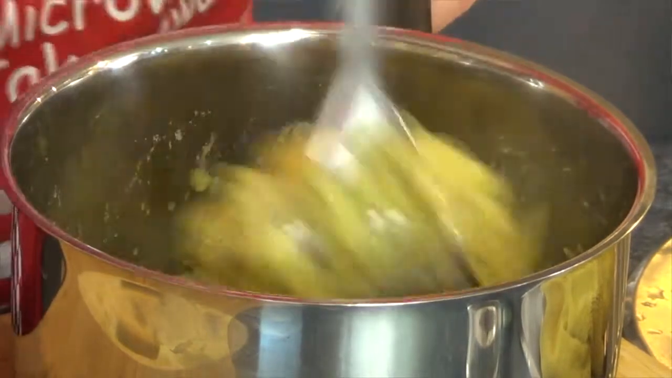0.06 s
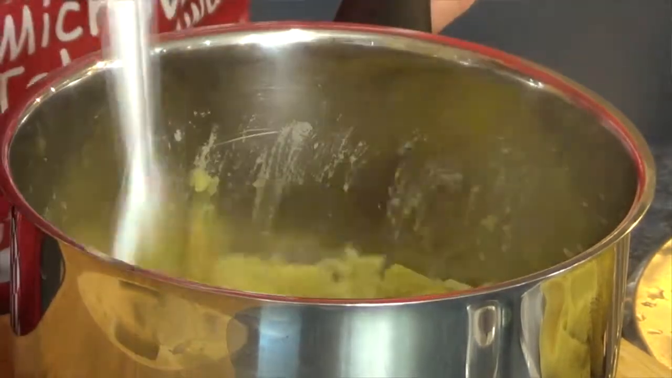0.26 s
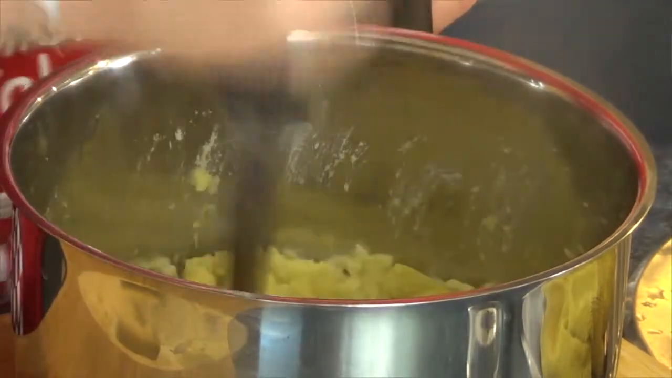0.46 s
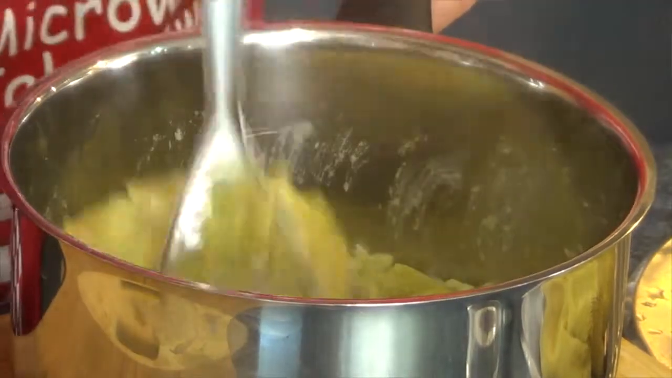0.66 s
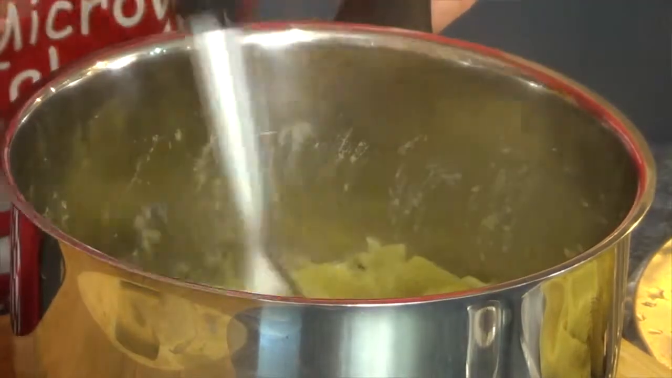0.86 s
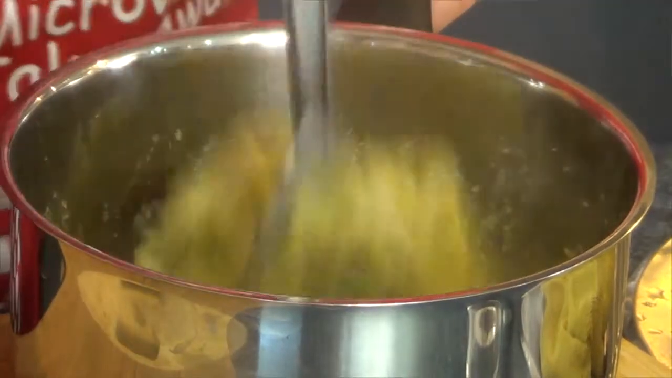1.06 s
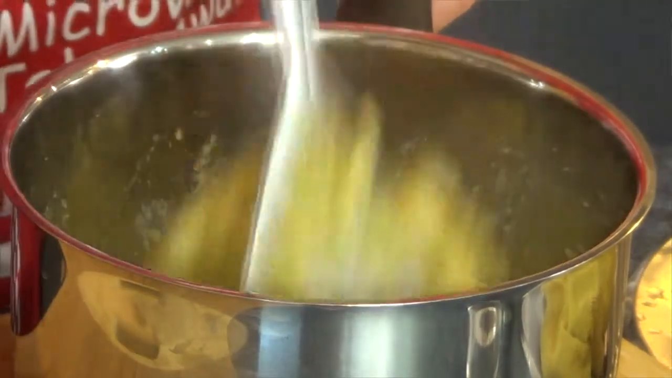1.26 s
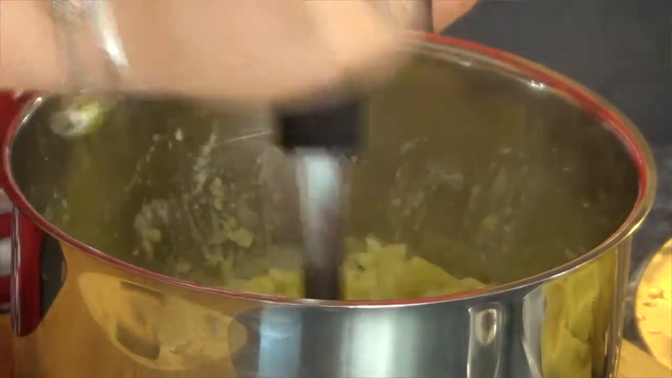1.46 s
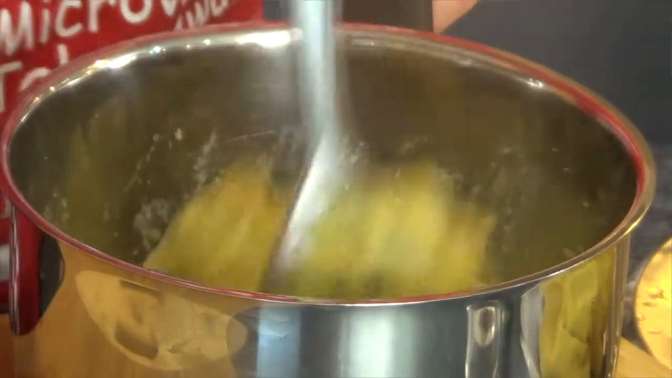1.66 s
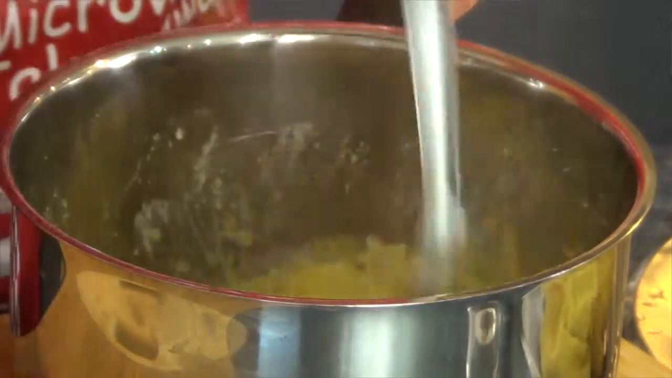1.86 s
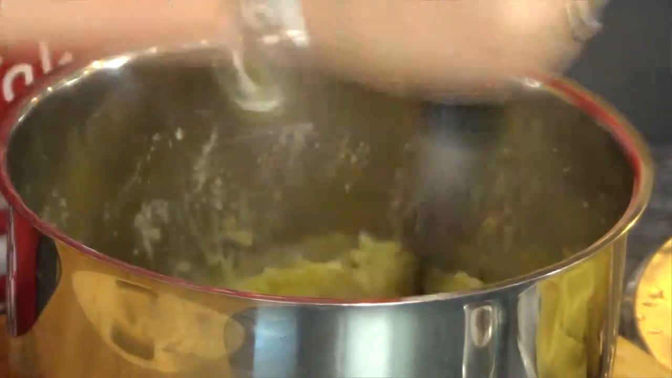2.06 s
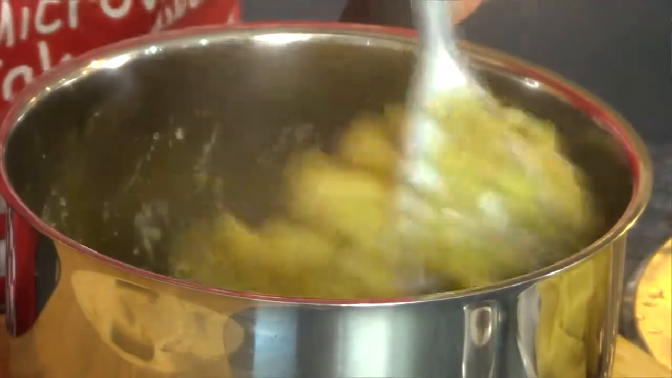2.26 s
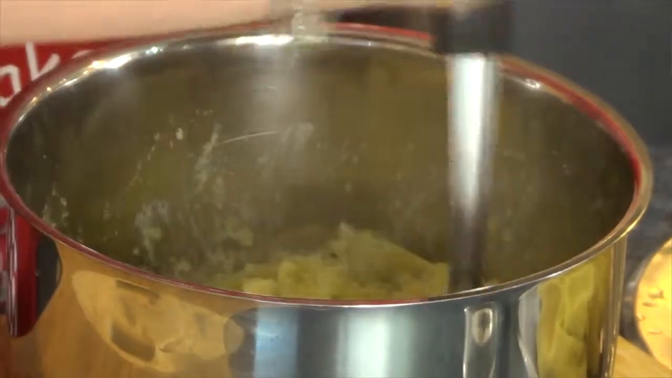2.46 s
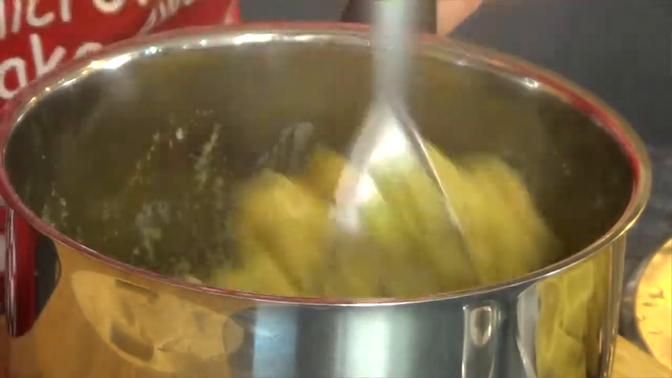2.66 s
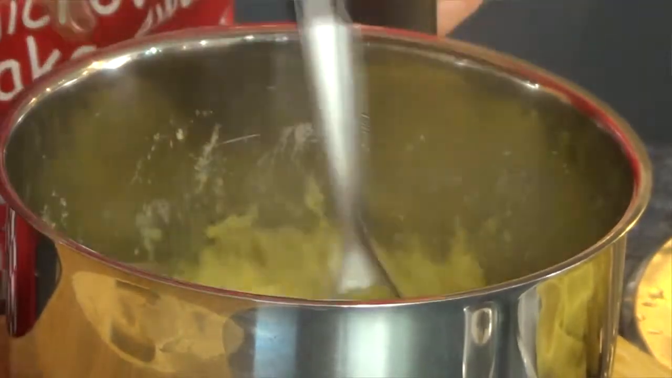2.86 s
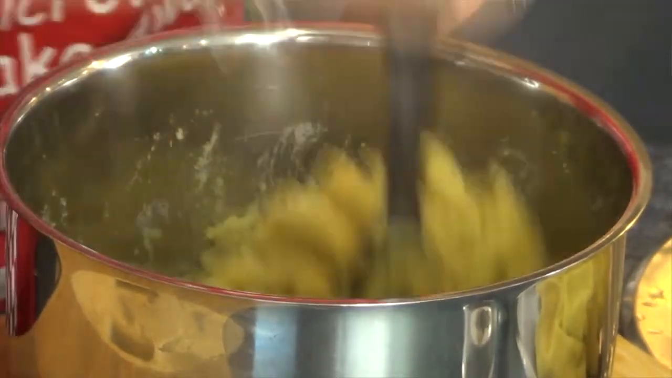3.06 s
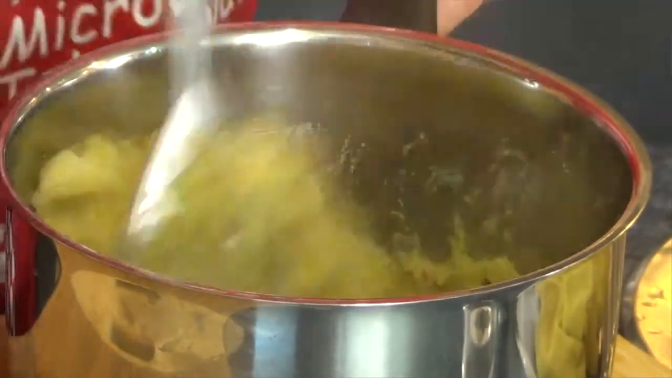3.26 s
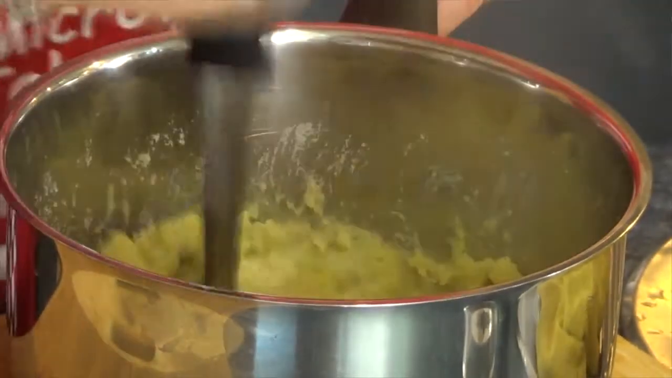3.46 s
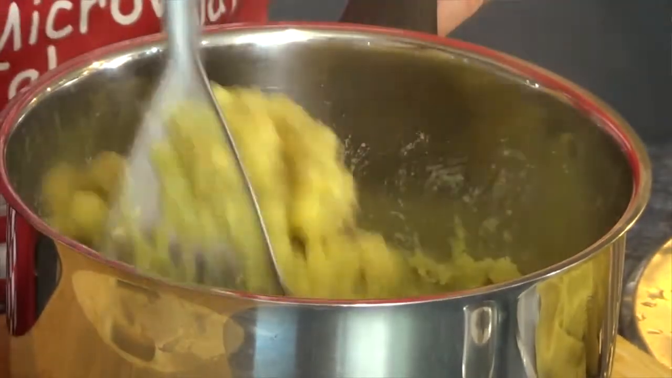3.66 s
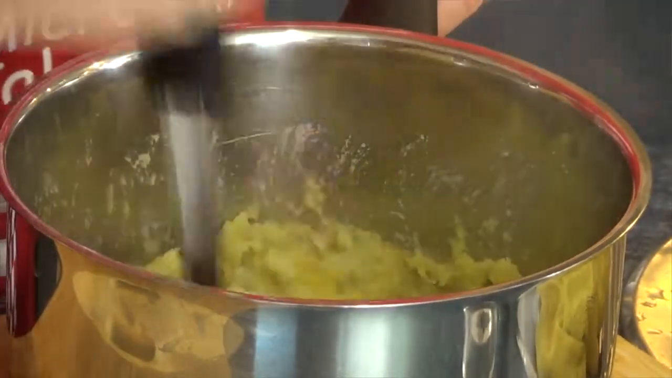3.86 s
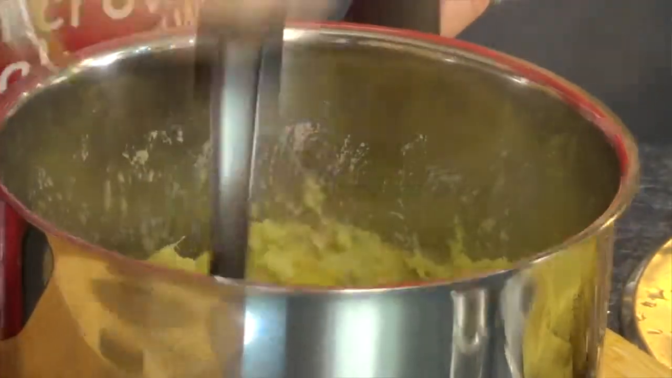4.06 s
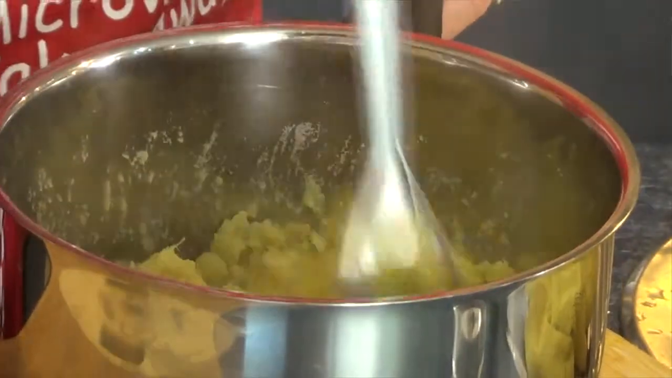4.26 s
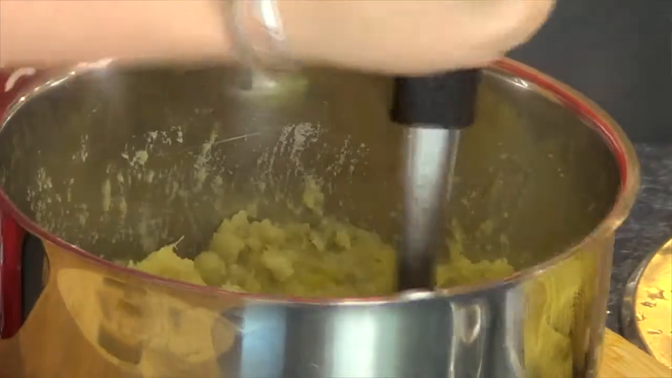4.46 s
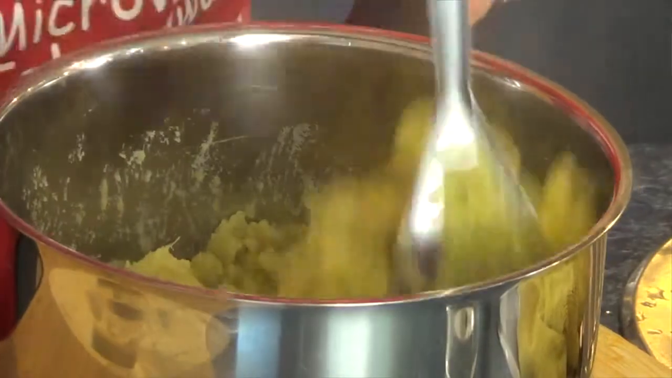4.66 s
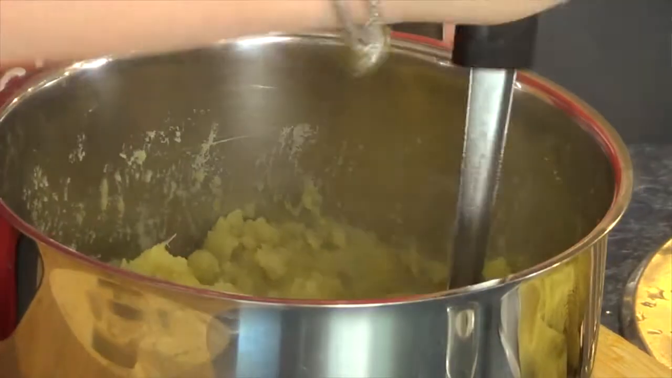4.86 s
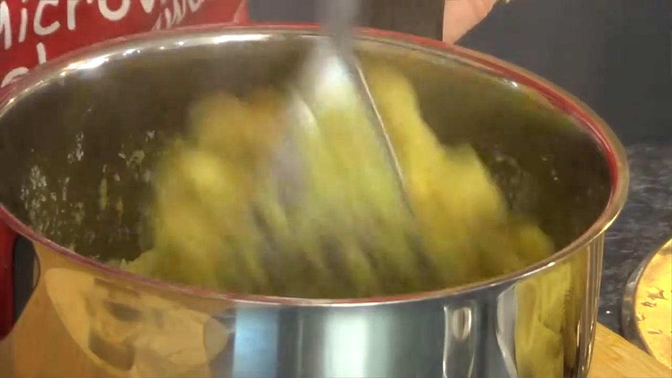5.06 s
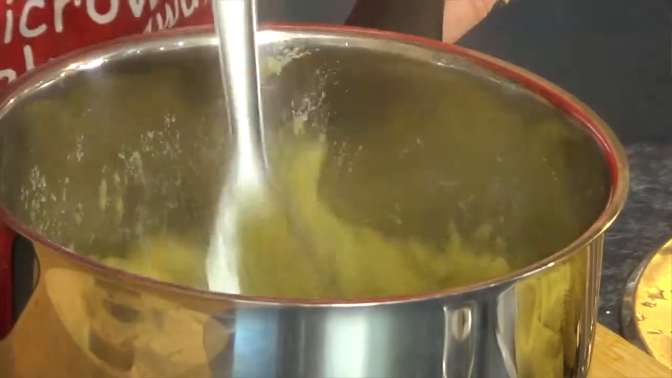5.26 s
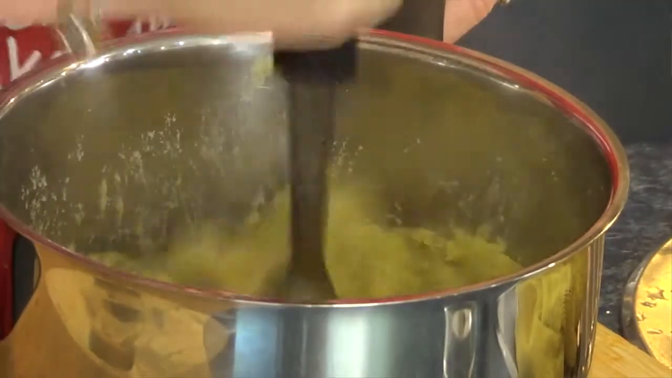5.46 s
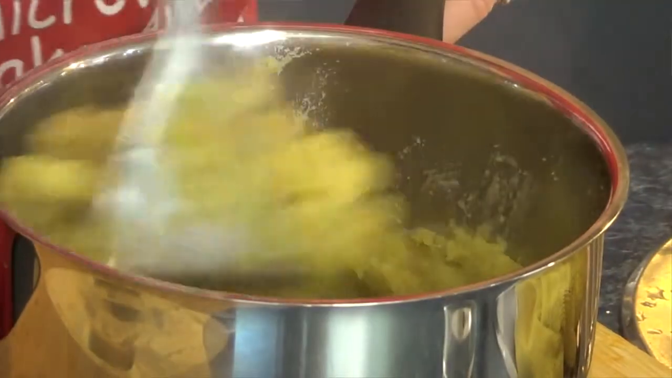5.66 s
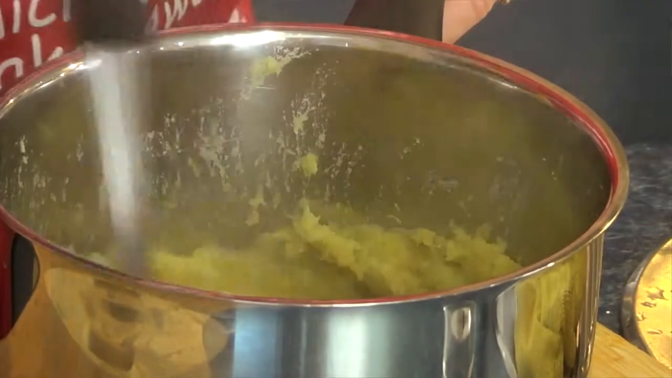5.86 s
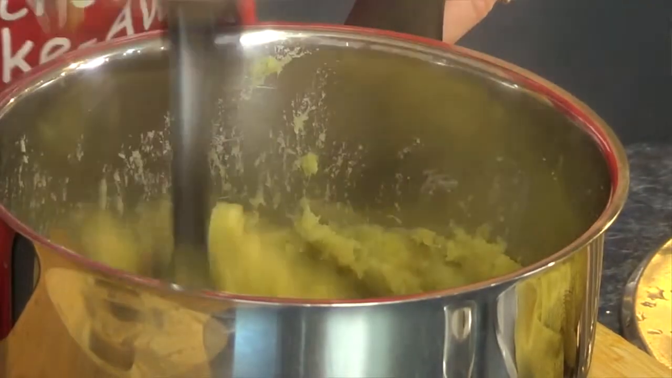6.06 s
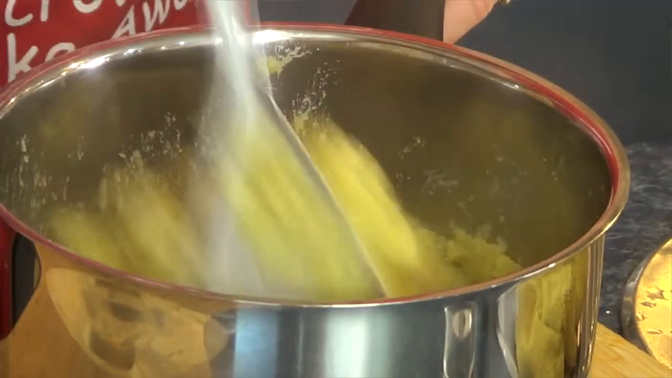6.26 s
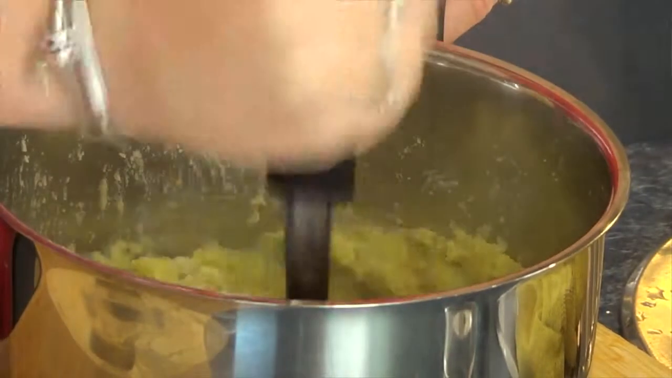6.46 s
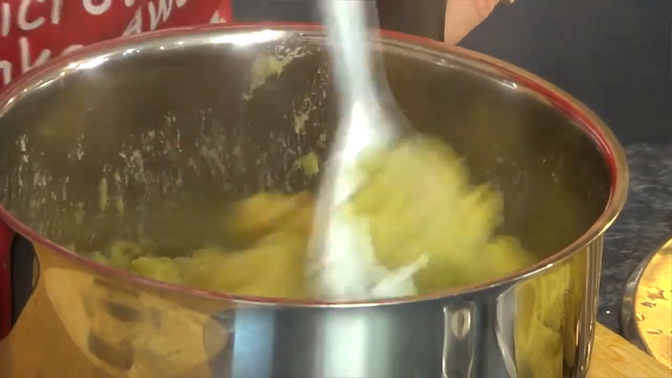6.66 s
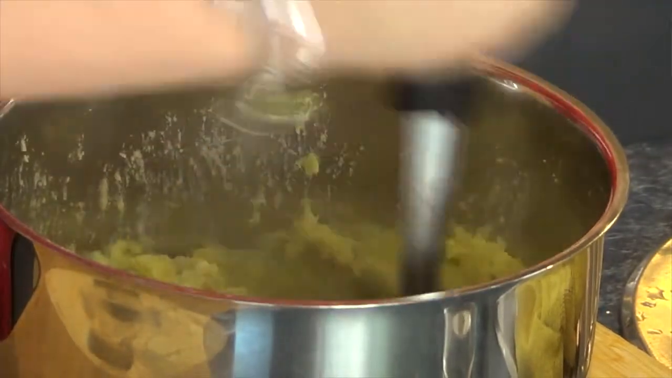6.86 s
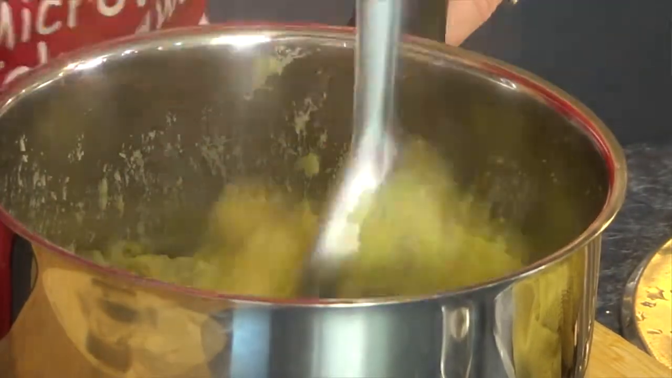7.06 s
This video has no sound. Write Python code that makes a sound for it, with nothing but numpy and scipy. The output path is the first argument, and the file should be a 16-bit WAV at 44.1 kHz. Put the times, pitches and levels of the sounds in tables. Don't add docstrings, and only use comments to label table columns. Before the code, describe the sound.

A metal masher slaps and squelches through soft boiled potato in a steel pot, with wet squirts, sticky snaps and dull knocks in a quiet kitchen.

```python
import sys
import numpy as np
from scipy import signal
from scipy.fft import rfft, irfft, next_fast_len
from scipy.io import wavfile
from scipy.ndimage import uniform_filter1d, map_coordinates

SR = 44100
rng = np.random.default_rng(int(sys.argv[2]) if len(sys.argv) > 2 else 0)


def int16_out(signal):
    q = np.round(np.clip(np.atleast_2d(signal).T, -1, 1) * 32767)
    wavfile.write(sys.argv[1], SR, q.astype(np.int16))


def rack_gain(trim_db):
    fader = np.asarray(trim_db, float)
    return 10 ** (fader / 20)


N = 313110

# [f/Hz, level/dB]
ROOM_AIR = [(15, -54), (25, 3.5), (49, 12.5), (84, -3), (123, -5.5), (145, -22), (195, -3.5), (317, -23.5),
            (451, -6.5), (641, -10.5), (12900, -34.5), (16000, -34)]
# [f/Hz, level/dB rms]
FRIDGE_HUM = [(118.4, -62), (199.2, -67), (269.2, -71), (371.4, -66.5), (452.2, -65.5)]
# [t/s of full weight, squelch level/dB, pot stirred level/dB, board rocked level/dB]
PUSHES = [(0.0, -54, -50.5, -37.5), (0.529, -52, -52, -34), (1.029, -55.5, -61, -39.5),
          (1.532, -58.5, -66, -38), (1.992, -51.5, -41.5, -43), (2.581, -60.5, -46.5, -48),
          (3.051, -56, -40, -43), (3.558, -58, -53, -35.5), (4.11, -63, -53, -47), (4.36, -60, -45, -42),
          (4.66, -66, -45, -41), (5.1, -63, -36.5, -34.5), (5.42, -57, -43.5, -41),
          (5.669, -55, -48.5, -45.5), (6.119, -58.5, -53, -48.5), (6.53, -55, -50, -45),
          (7.08, -54.5, -43, -40.5)]
# [squelch, pot, board], each in dB/s
BUILD_RATES = [110, 145, 57]
# [squelch, pot, board], each in dB/s
EASE_RATES = [39, 74, 114.5]
# [f/Hz, level/dB]
FIZZ_COLOUR = [(500, 21), (1200, 5), (2500, -19), (5000, 10), (9000, 6.5), (14000, 5), (15900, -2)]
# [f/Hz, width/Hz, level/dB]
POT_MODES = [(344, 350, -2), (431.8, 36, 9), (607, 76, -3.5), (928, 250, -4), (994, 80, -6),
             (1394, 140, -10), (1810, 104, -10), (2210, 350, -15), (2900, 400, -14.5)]
# [f/Hz, width/Hz, level/dB]
BOARD_MODES = [(70.6, 45, -4.5), (152.3, 11.4, -1), (197, 34.6, -6.5)]
# [t/s, peak level/dB, f/Hz]
THUDS = [(0.325, -31.5, 197), (0.441, -43, 53.8), (0.508, -31, 70.0), (0.558, -39, 129), (0.0, -39, 152),
         (1.353, -34.5, 128), (1.52, -37, 193), (1.891, -36.5, 156), (2.175, -35, 120), (2.402, -31, 183),
         (2.981, -30.5, 73), (3.408, -39, 195), (3.463, -32, 67.3), (3.539, -54, 67), (3.846, -38, 153),
         (3.905, -29.5, 184), (3.958, -33.5, 148), (4.217, -25.5, 96), (4.589, -32, 131),
         (4.657, -13, 83.4), (4.719, -27, 167), (5.083, -23.5, 161), (5.1, -22, 73.4), (5.341, -32.5, 141),
         (5.44, -32, 60), (5.84, -32.5, 192), (5.922, -40, 51.1), (6.349, -29.5, 166), (6.451, -32.5, 75),
         (6.637, -34, 82)]
# [t/s, peak level/dB, f/Hz, length/s]
SQUIRTS = [(0.045, -37, 11800, 0.075), (0.52, -56, 4380, 0.04), (0.552, -61, 8580, 0.05),
           (0.628, -39, 11200, 0.068), (1.086, -36.5, 7100, 0.067), (1.15, -43, 7420, 0.062),
           (1.665, -38, 10100, 0.052), (2.06, -41, 12200, 0.046), (2.146, -35, 6600, 0.11),
           (2.646, -32.5, 13100, 0.048), (3.118, -39.5, 7340, 0.048), (3.634, -40, 13500, 0.075),
           (4.142, -33.5, 4100, 0.051), (4.428, -32, 4610, 0.056), (4.595, -36.5, 4940, 0.086),
           (4.852, -34.5, 7000, 0.085), (5.048, -35, 4670, 0.065), (5.341, -38.5, 7260, 0.083),
           (5.587, -38.5, 12600, 0.033), (6.124, -32.5, 13300, 0.1), (6.438, -31, 4800, 0.091),
           (6.527, -41, 2500, 0.07), (6.588, -38, 12900, 0.059), (6.7, -39, 7930, 0.067),
           (6.914, -31, 2800, 0.029), (6.933, -30.5, 11100, 0.045), (1.435, -30.5, 1490, 0.14)]
# [t/s, peak level/dB, f/Hz]
SNAPS = [(0.9558, -34, 2750), (1.093, -39, 4970), (1.1188, -35.5, 13600), (1.4437, -31.5, 2600),
         (1.572, -35, 6100), (1.5914, -44, 2630), (1.606, -48, 2620), (1.6745, -36, 10300),
         (2.018, -39, 3120), (2.5064, -29, 2540), (2.615, -39.5, 2500), (3.5059, -43, 3030),
         (3.5927, -48, 2950), (3.68, -43, 11700), (3.9412, -27.5, 3300), (4.028, -37, 2500),
         (4.0448, -30.5, 7550), (4.086, -40, 7140), (4.6234, -37, 3150), (4.8598, -36, 2500),
         (5.061, -39, 3180), (5.3973, -29.5, 3170), (5.4248, -31, 2800), (5.5252, -38.5, 2730),
         (5.547, -42, 5990), (5.6053, -35, 12800), (5.9554, -37, 3470), (6.625, -50, 6000),
         (6.927, -27.5, 2650), (7.009, -42, 2900)]
# [f/Hz, level/dB]
SPLASH_COLOUR = [(600, -10), (1500, 12.5), (3000, 8.5), (8000, 3.5), (15500, 0), (16400, -33)]
# [t/s, peak level/dB, main ring f/Hz, splash level/dB, squeeze level/dB]
SLAPS = [(0.325, -20.5, 866, -2.5, -10.5), (0.867, -20, 806, 0, -18.5), (1.357, -19.5, 620, -2, -13.5),
         (1.895, -20, 730, -5.5, -17), (2.401, -20.5, 1050, -3.5, -15.5), (2.907, -28.5, 444, 5, -21.5),
         (3.405, -21.5, 760, -3.5, -17), (3.843, -20, 408, -6, -17), (3.908, -23, 430, 0.5, -18),
         (5.836, -19, 725, -6, -12.5), (5.904, -31, 920, -0.5, -14), (5.936, -29, 413, 0, -11.5),
         (6.352, -20, 386, -3.5, -15.5), (6.38, -22, 463, -2, -16.5), (6.79, -24, 680, -1, -23.5)]
# [t/s, peak level/dB, main ring f/Hz, splash level/dB, squeeze level/dB]
PRESSES = [(2.46, -28, 1030, 0.5, -13), (3.462, -34, 603, -7, -12), (3.964, -29, 584, 1, -15),
           (4.268, -19, 730, 0, -26), (4.408, -41, 547, 5, -18), (4.593, -31.5, 390, -13, -24),
           (4.718, -18, 730, 0.5, -19), (5.026, -37.5, 394, -6, -10), (5.347, -33, 343, -7.5, -5),
           (5.382, -43, 1300, -14, -2), (5.413, -47, 1270, -10, -22), (6.442, -32.5, 680, 6.5, -12.5),
           (6.905, -33.5, 550, -4, -26)]
# [t/s, peak level/dB, main ring f/Hz, click level/dB, damping t60/s]
KNOCKS = [(0.437, -21, 640, -3.5, 0.014), (0.5, -24.5, 655, -8.5, 0.043), (1.484, -45, 420, 9, 0.087),
          (1.499, -32, 527, 10, 0.1), (1.523, -19.5, 714, -3.5, 0.066), (1.616, -28, 407, -8, 0.05),
          (2.187, -26.5, 420, -21, 0.041), (2.98, -29.5, 640, 1, 0.018), (3.067, -42.5, 430, 2, 0.059),
          (4.209, -30, 685, -24, 0.13), (4.228, -14, 400, -25, 0.032), (4.417, -26, 510, -4, 0.019),
          (4.664, -10.5, 422, -4, 0.24), (5.088, -15, 450, -8, 0.1), (5.293, -34.5, 430, 1.5, 0.042),
          (5.398, -34, 640, 3.5, 0.19), (5.435, -34.5, 596, -1.5, 0.046), (6.084, -34.5, 690, -1, 0.099),
          (6.65, -27.5, 410, -21, 0.065), (7.071, -40, 350, -6, 0.081)]
# [f/Hz, t60/s]
KITCHEN_DECAY = [(150, 0.53), (700, 0.56), (3000, 0.31), (12000, 0.48)]
# [f/Hz, level/dB]
PREAMP_HISS = [(30, 14), (200, -3.5), (1000, -3), (15500, -7.5), (16000, -30)]


def unit(x):
    return x / np.sqrt(np.mean(x ** 2) + 1e-20)


def along(points, hz):
    f, v = np.transpose(points)
    return np.interp(np.log(hz + 1), np.log(f + 1), v)


def wobble(rate):
    knots = rng.standard_normal(int(N * rate / SR) + 4)
    return map_coordinates(knots, [np.arange(N) * rate / SR])


def filtered(x, response):
    m = next_fast_len(x.shape[-1] + 8192)
    return irfft(rfft(x, m) * response(np.fft.rfftfreq(m, 1 / SR)), m)[..., :x.shape[-1]]


def modes(table):
    def response(f):
        total = 0
        for k, (centre, width, db) in enumerate(table):
            damping = 1j * f * width
            total = total + (-1) ** k * rack_gain(db) * damping / (centre ** 2 - f ** 2 + damping)
        return total
    return response


def colour(points):
    return lambda hz: rack_gain(along(points, hz))


def add(track, s, sound, db):
    track[round(s * SR):][:len(sound)] += rack_gain(db) * sound / np.abs(sound).max()


def lumpy(size, depth_db):
    return rack_gain(depth_db * unit(uniform_filter1d(rng.standard_normal(size), size=120)))


def patchy(wide, long, deep_db):
    z = signal.stft(rng.standard_normal(N), nperseg=128)[2]
    field = uniform_filter1d(rng.standard_normal(z.shape), int(wide), 0)
    field = uniform_filter1d(field, int(long), 1)
    return unit(signal.istft(z * rack_gain(deep_db * unit(field)), nperseg=128)[1][:N])


def pot(ring_hz, dull_hz, upper_db):
    spot = modes([(ring_hz, 0.4 * ring_hz, 0), (1350, 500, upper_db)])
    body = modes(POT_MODES)
    body_gain = rack_gain(-8.5 * max(np.log2(ring_hz / 500), 0))

    def response(f):
        rings = spot(f) + body_gain * body(f)
        return rings / (1 + 1j * f / dull_hz) ** 2 * (1j * f / (250 + 1j * f)) ** 2
    return response


def background():
    t = np.arange(N) / SR
    air = unit(filtered(rng.standard_normal(N), colour(ROOM_AIR)))
    out = rack_gain(-55.5 + 0.48 * wobble(1.02)) * air
    for hz, db in FRIDGE_HUM:
        level = np.sqrt(2) * rack_gain(db + 0.5 + 1.1 * wobble(29))
        drift = np.cumsum(3 * wobble(6.7)) / SR
        out += level * np.sin(2 * np.pi * (hz * t + drift))
    return out


def mash():
    t = np.arange(0, N + 256, 256) / SR
    build, ease = np.array([BUILD_RATES, EASE_RATES])[:, :, None]
    weight = 0
    for s, *db in PUSHES:
        away = np.where(t < s, build * (s - t), ease * (t - s))
        weight = weight + rack_gain(np.array(db)[:, None] - away)
    squelch, shake, rock = [np.interp(np.arange(N) / SR, t, w) for w in weight]
    fizz = rack_gain(3 * wobble(40)) * patchy(8.1, 1.6, deep_db=4.0)
    wet = unit(filtered(fizz, colour(FIZZ_COLOUR)))
    stirred = unit(filtered(rack_gain(3.8 * wobble(40)) * rng.standard_normal(N), modes(POT_MODES)))
    rocked = unit(filtered(rack_gain(4.8 * wobble(17)) * rng.standard_normal(N), modes(BOARD_MODES)))
    return squelch * wet + rack_gain(-5) * (shake * stirred + rock * rocked)


def thuds():
    out, t = np.zeros(N + SR), np.arange(SR // 2) / SR
    for s, db, hz in THUDS:
        t60 = 0.15 * 2 ** ((-40.5 - db) / 18)
        bump = np.sin(2 * np.pi * hz * t) * rack_gain(-60 * t / t60) * (1 - np.exp(-t / 0.003))
        note = 0.2 * np.sin(2 * np.pi * 155 * t + rng.random()) * rack_gain(-60 * t / 0.52)
        add(out, s + 0.0074, bump + note, db)
    return out[:N]


def squirts():
    out, t = np.zeros(N + SR), np.arange(SR // 8) / SR
    for s, db, hz, length in SQUIRTS:
        swell = np.sin(np.pi * np.clip(t / min(length, 0.12), 0, 1) ** 0.42) ** 2
        burst = rng.standard_normal(len(t)) * swell * lumpy(len(t), depth_db=6.5)
        splash = unit(filtered(burst, colour(SPLASH_COLOUR)))
        pitched = unit(filtered(burst, modes([(hz, 1.35 * hz, 0)])))
        add(out, s - 0.008, 0.71 * splash + pitched, db)
    return out[:N]


def snaps():
    out, t = np.zeros(N + SR), np.arange(SR // 8) / SR
    pops = []
    for push_s, *_ in PUSHES:
        for late, soft, high in rng.random((3, 3)):
            pops.append((push_s + 0.16 * late, -54 - 8 * soft, 3000 * 2 ** (1.4 * high)))
    for s, db, hz in SNAPS + pops:
        burst = rng.standard_normal(len(t)) * rack_gain(-60 * t / 0.009)
        band = modes([(hz, 0.42 * hz, 0)])
        splash = unit(filtered(burst, colour(SPLASH_COLOUR)))
        pitched = unit(filtered(burst, lambda f: band(f) ** 2))
        add(out, s, 0.46 * splash + pitched, db)
    return out[:N]


def blows(table, t60):
    out, t = np.zeros(N + SR), np.arange(SR // 3) / SR
    splash_colour = colour(SPLASH_COLOUR)
    rise = 1 - np.exp(-t / 0.00088)
    push = 5 * t / 0.0014 * np.exp(-t / 0.00032)
    push = np.pad(push, (70, 0))[:len(t)]
    for s, db, ring_hz, splash_db, squeeze_db in table:
        ragged = rng.standard_normal((2, len(t)))
        squeeze = rise * lumpy(len(t), depth_db=3.0) * rack_gain(squeeze_db - 60 * t / 0.4)
        squeeze /= 1 + (t / 0.72) ** 4
        strike = (1 - np.exp(-t / 0.0032)) * rack_gain(-60 * t / t60)
        force = push + ragged[0] * (strike + squeeze)
        add(out, s, filtered(force, pot(ring_hz, dull_hz=2500, upper_db=-10)), db)
        splash = filtered(ragged[1], splash_colour) * rise * rack_gain(-60 * t / (0.61 * t60))
        ooze = filtered(ragged[1, ::-1] * squeeze, lambda f: splash_colour(f) / (1 + 1j * f / 6000))
        add(out, s, splash + rack_gain(1.5) * ooze, db + splash_db)
    return out[:N]


def knocks():
    out, t = np.zeros(N + SR), np.arange(SR // 3) / SR
    push = 7 * rack_gain(-60 * t / 0.0023) * (1 - np.exp(-t / 0.00037))
    tick = rack_gain(-60 * t / 0.011) * (1 - np.exp(-t / 0.00047))
    click_hz = 1980
    steel = modes([(click_hz, 0.9 * click_hz, 0)])
    for s, db, ring_hz, click_db, t60 in KNOCKS:
        ragged = rng.standard_normal((2, len(t)))
        wake = lumpy(len(t), depth_db=1.0) * (rack_gain(-60 * t / t60) + rack_gain(-6.5 - 60 * t / 0.34))
        force = push + ragged[0] * wake
        add(out, s, filtered(force, pot(ring_hz, dull_hz=1930, upper_db=-19)), db)
        edge = ragged[1] * (tick + rack_gain(-26) * wake)
        click = filtered(edge, lambda f: steel(f) / (1 + 1j * f / 7000) ** 2)
        add(out, s, click, db + click_db)
    return out[:N]


def kitchen(x):
    out, step = np.zeros(N + 2 * SR), SR // 4
    for start in range(0, N, step):
        hz, t, z = signal.stft(rng.standard_normal(SR // 2), SR, nperseg=256)
        decay = rack_gain(-60 * t / along(KITCHEN_DECAY, hz)[:, None])
        tail = signal.istft(z * decay, SR, nperseg=256)[1]
        wet = signal.fftconvolve(x[start:start + step], tail / np.linalg.norm(tail))
        out[start + 200:][:len(wet)] += wet
    return out[:N]


def scene():
    hits = thuds() + squirts() + snaps() + knocks()
    hits += blows(SLAPS, t60=0.032) + blows(PRESSES, t60=0.078)
    steady = background() + mash() + rack_gain(-9.5) * kitchen(hits)
    mid = hits + filtered(steady, lambda hz: hz < 15850)
    return np.array([mid, mid])


def roll_off(x):
    return signal.sosfilt(signal.butter(12, 16640, fs=SR, output="sos"), x)


def record(dry):
    hiss = rack_gain(-72) * unit(filtered(rng.standard_normal(N), colour(PREAMP_HISS)))
    wired = filtered(dry, lambda hz: (1j * hz / (35 + 1j * hz)) ** 3) + [hiss, -hiss]
    mix = filtered(wired, lambda hz: hz < 16560)
    return roll_off(mix)


dry = scene()
out = record(dry)
int16_out(out)
```